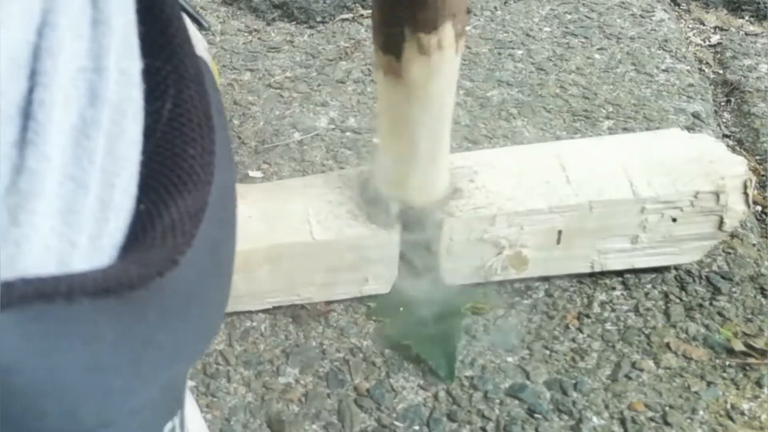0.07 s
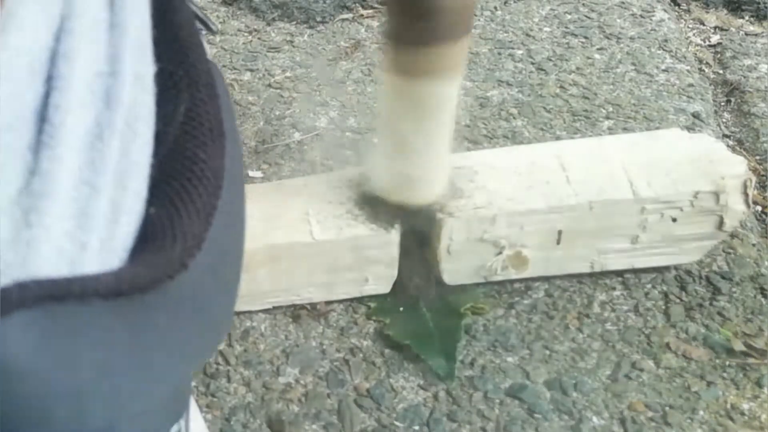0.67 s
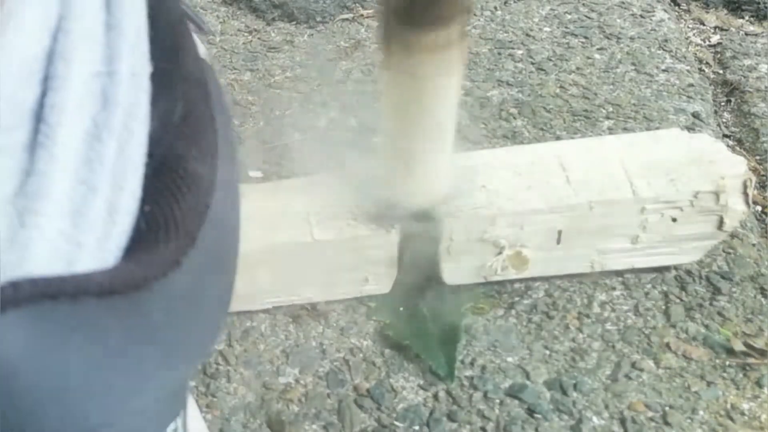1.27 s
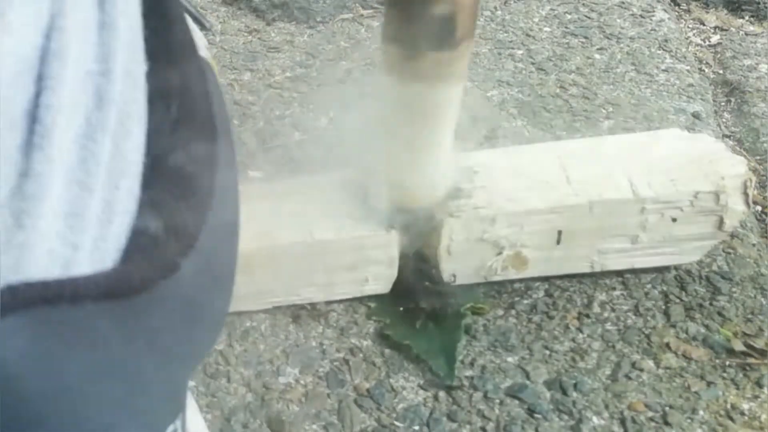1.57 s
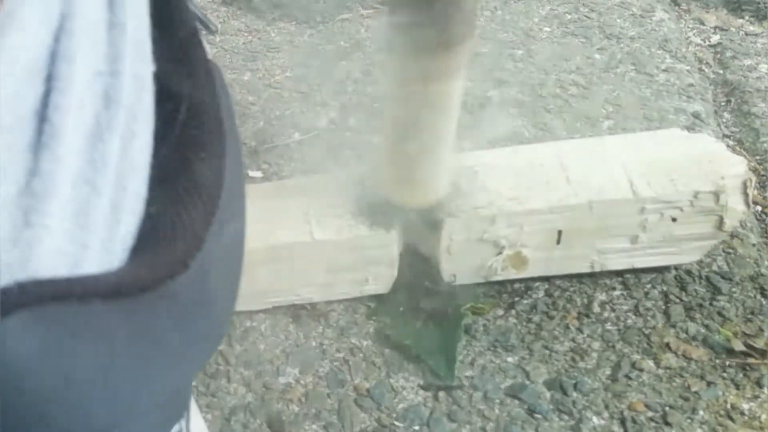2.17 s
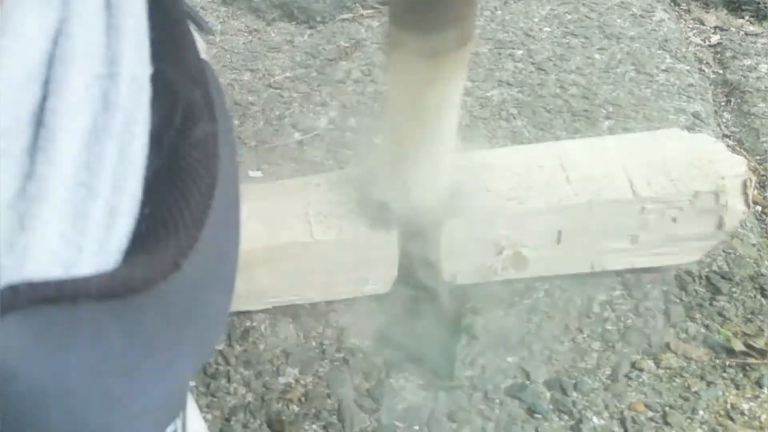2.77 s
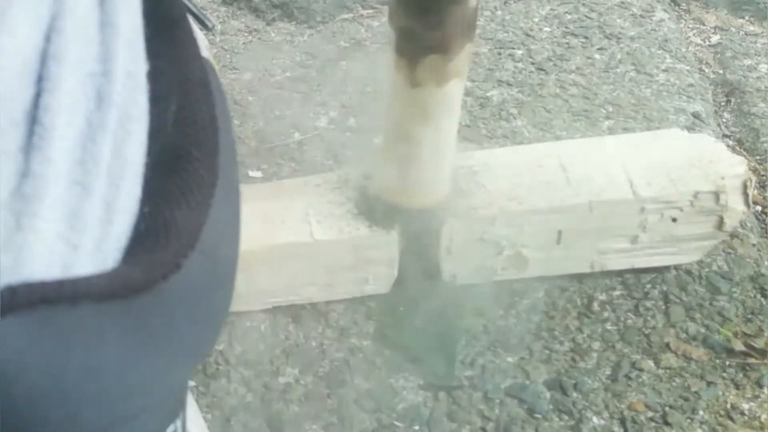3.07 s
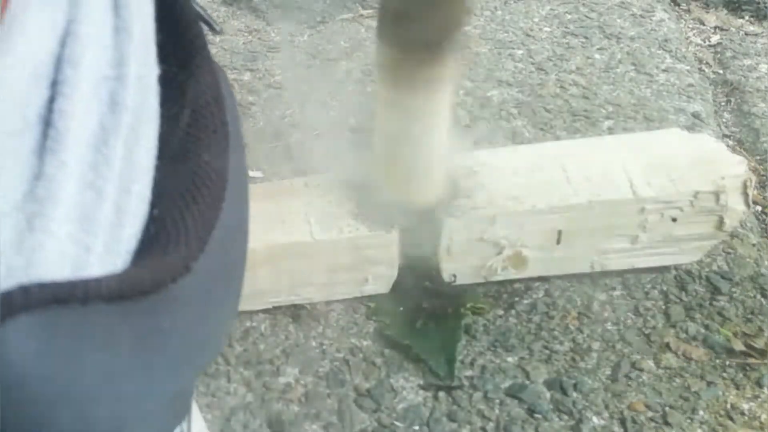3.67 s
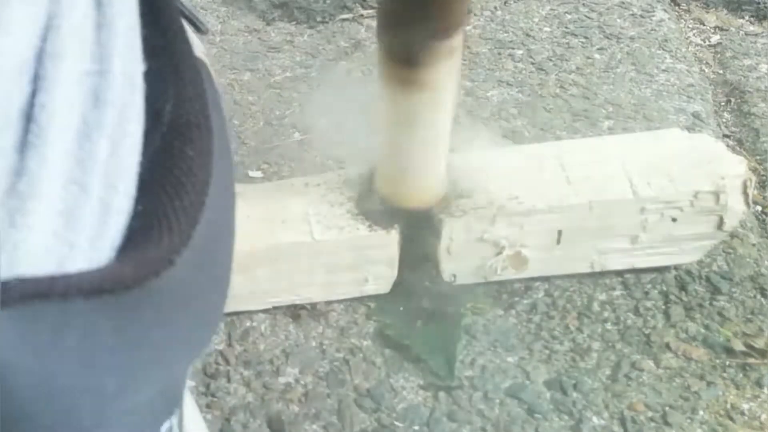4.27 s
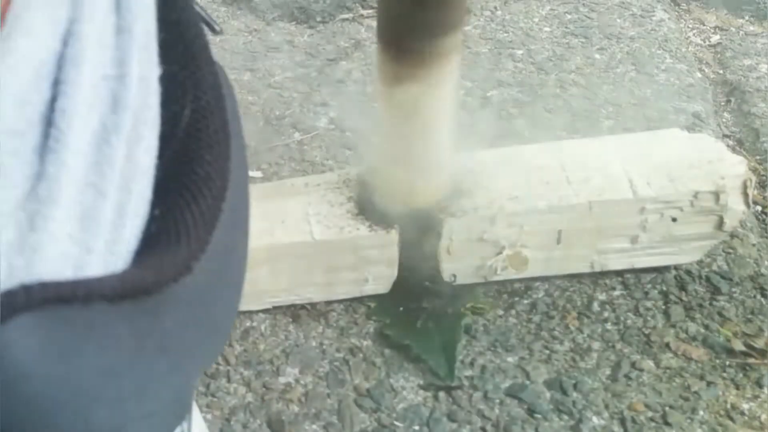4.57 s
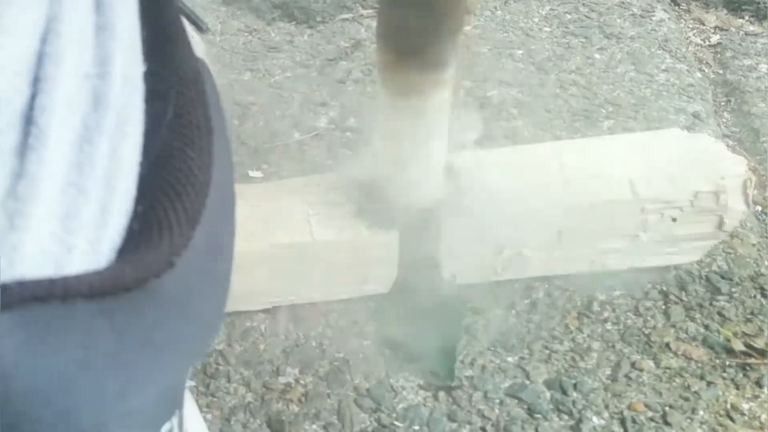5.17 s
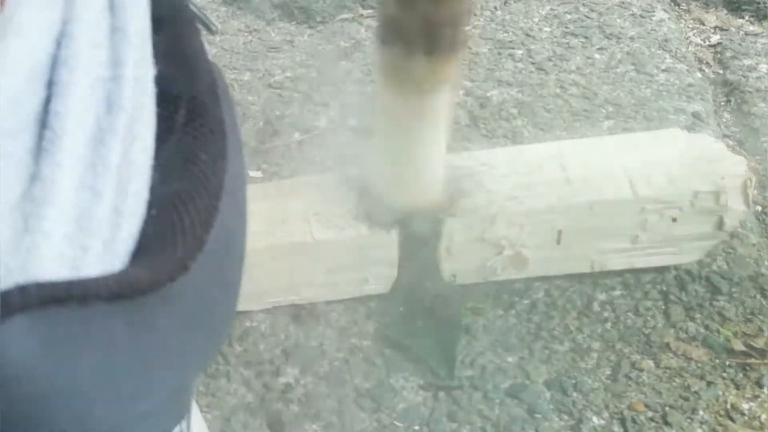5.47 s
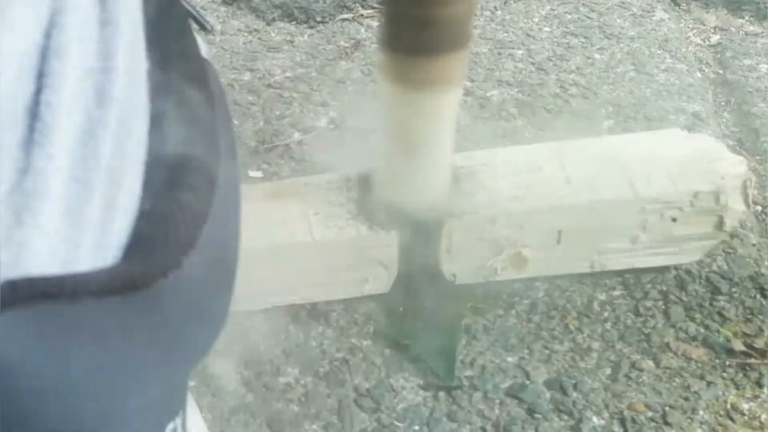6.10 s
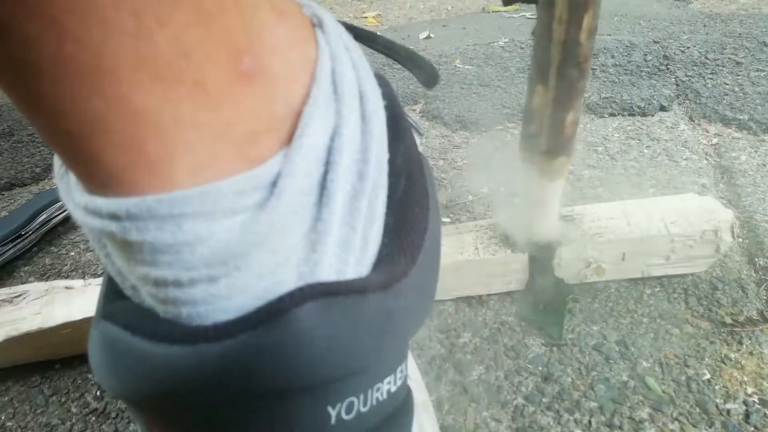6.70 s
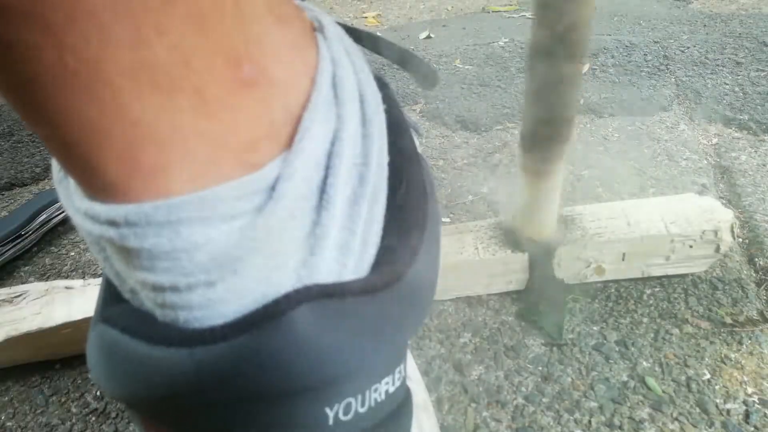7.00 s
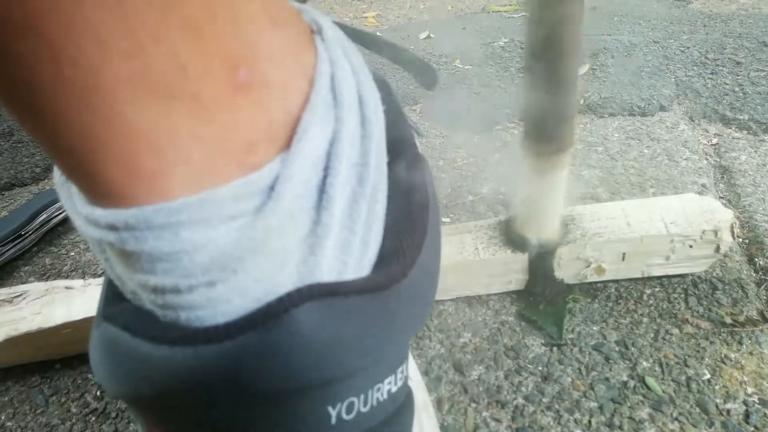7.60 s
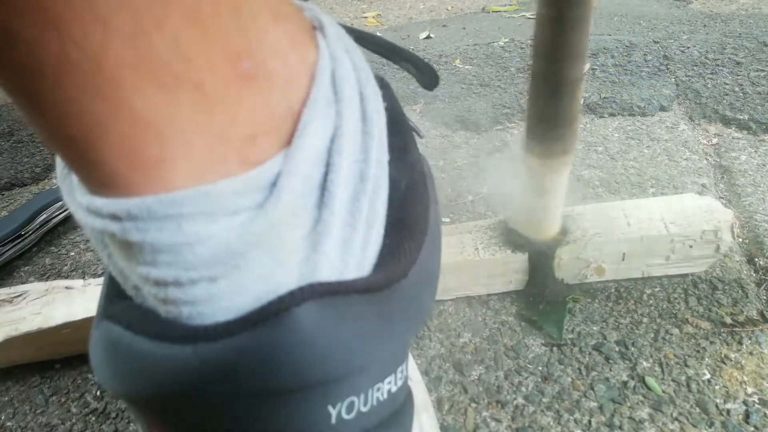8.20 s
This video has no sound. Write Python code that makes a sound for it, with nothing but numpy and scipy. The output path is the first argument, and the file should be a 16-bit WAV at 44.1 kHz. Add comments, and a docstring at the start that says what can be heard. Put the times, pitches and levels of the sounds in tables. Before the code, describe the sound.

Close by and mostly on the left, wood grinds against wood in a quick, even back-and-forth rhythm as a spindle is bowed in a board. Light thuds, occasional clicks and brief squeaks dot the dry, hissing rasp. In the last couple of seconds the bowing is more hurried, with frequent hollow knocks and rough scrapes. Faint outdoor air and a far engine-like hum lie underneath.

```python
"""Bow drill on a pavement

A wooden spindle spins to and fro in the socket of a fire board, about four strokes a second.
Each stroke rasps, rings and hisses; late in a push the spindle judders, and at times the tip squeaks
or bites. The bow knocks at some turns, more often as the work gets hurried. Low outdoor rumble and a
distant engine-like hum lie underneath. The camera is close, its right port facing away."""
import sys
import numpy as np
from scipy import signal
from scipy.fft import rfft, irfft, next_fast_len
from scipy.io import wavfile
from scipy.ndimage import uniform_filter1d, map_coordinates

SR = 44100
rng = np.random.default_rng(int(sys.argv[2]) if len(sys.argv) > 2 else 0)


def put_to_file(sound):
    """Save the sound as 16-bit audio at rate SR, in the file named by the first command-line argument."""
    columns = np.atleast_2d(sound).T  # one column per channel
    safe = np.clip(columns, -1, 1)
    whole_steps = np.round(safe * 32767)
    wavfile.write(sys.argv[1], SR, whole_steps.astype(np.int16))


N = 372644

# hurry of the bowing: (time [s], haste [0 calm, about 1 hurried])
HASTE = [(0, 0.24), (2.5, 0.058), (5.9, 0.27), (6.6, 0.82), (8.45, 1.2)]
# spindle and board resonances: (frequency [Hz], width [Hz], lift [dB])
WOOD_MODES = [(194.4, 36, 6), (343, 50, 5.5), (456.3, 43, 9), (657, 390, 4.5), (839, 228, 11),
              (1350, 120, 13.5), (2117, 520, 6.5), (2467, 210, 5), (3190, 1300, 3.5), (6330, 1940, 7),
              (9540, 690, 7.5)]
# contact force spectra: (frequency [Hz], level [dB])
RASP_SPECTRUM = [(100, -16), (300, -2), (560, -3), (1050, -7), (1700, -0.5), (2600, -3), (2900, -9.5),
                 (3700, -8), (4050, -26.5), (6000, -22), (16000, -76)]
HISS_SPECTRUM = [(1500, -30), (4000, -0.5), (5000, 2), (7000, 3), (8000, 2.5), (11000, -2), (13500, 4.5),
                 (16000, 2.5)]
TICK_SPECTRUM = [(1000, -45), (4000, -2), (7000, 0), (10000, -1), (13000, -3), (16000, 0)]


def amp(db):
    return 10 ** (np.asarray(db) / 20)


def unit_rms(x):
    return x / np.sqrt(np.mean(x ** 2) + 1e-20)


def unit_peak(x):
    return x / np.abs(x).max()


def add(track, at_s, sound):
    part = track[round(at_s * SR):][:len(sound)]
    part += sound[:len(part)]


def log_interp(points, hz):
    knots_hz, values = np.transpose(points)
    return np.interp(np.log(hz + 1), np.log(knots_hz + 1), values)


def wobble(knots_per_s):
    """Smooth random curve."""
    return map_coordinates(rng.standard_normal(N // 40), [np.arange(N) * knots_per_s / SR], mode="wrap")


def coloured(x, spectrum, modes=()):
    """Minimum-phase filter: a spectrum lifted at each resonance."""
    size = 2 * next_fast_len(len(x) // 2 + 4096)
    hz = np.fft.rfftfreq(size, 1 / SR)
    lift_db = sum(lift / (1 + (2 * (hz - centre) / width) ** 2) for centre, width, lift in modes)
    cepstrum = irfft(np.log(amp(log_interp(spectrum, hz) + lift_db)))
    cepstrum[1:size // 2] *= 2
    cepstrum[size // 2 + 1:] = 0
    return irfft(rfft(x, size) * np.exp(rfft(cepstrum)))[:len(x)]


def ringing(x, hz, width_hz):
    """Two equal resonators in series."""
    b, a = signal.iirpeak(hz, hz / width_hz, SR)
    return signal.lfilter(b, a, signal.lfilter(b, a, x))


def slips(per_s, scatter_db, smooth):
    """Tiny slips of random size over a share of smooth sliding noise."""
    sizes = rng.standard_normal(N) * amp(scatter_db * rng.standard_normal(N))
    impulses = sizes * (rng.random(N) < per_s / SR)
    return unit_rms(unit_rms(impulses) + smooth * rng.standard_normal(N))


def bowing():
    """Spindle speed (0-1) and rasp, ring, hiss and rumble envelopes; all stop when the bow turns."""
    # pull and push in turn: (time [s], level [dB])
    strokes = [(-0.122, -37), (0.138, -37.5), (0.382, -35), (0.633, -35.5), (0.864, -36.5), (1.145, -37.5),
               (1.391, -36.5), (1.648, -37.5), (1.892, -36), (2.145, -36), (2.38, -35.5), (2.643, -35),
               (2.875, -34.5), (3.133, -33.5), (3.357, -36), (3.618, -36), (3.836, -33.5), (4.071, -35),
               (4.28, -34), (4.515, -36), (4.731, -34.5), (4.963, -35), (5.18, -34), (5.407, -35.5),
               (5.616, -34), (5.838, -34), (6.035, -33.5), (6.252, -33.5), (6.548, -33), (6.757, -34.5),
               (6.939, -33), (7.166, -35.5), (7.355, -34), (7.567, -35), (7.755, -33), (7.962, -37),
               (8.156, -33.5), (8.36, -37)]
    # pairs: (pull, push)
    pause_s, briskness = (0.0031, 0.01596), (1.7, 1.6)
    swell_db, haste_swell_db = (-0.5, 1.5), (8.5, -2)
    ring_db = (-5, -3.45)
    hiss_db, haste_hiss_db, tilt_hiss_db = (-17, -14.5), (0, 3.5), (0.5, 12)
    rumble_db, haste_rumble_db, tilt_rumble_db = (-8, -4.5), (-7, 1), (7, 19.5)
    last_turn_s, jam_start_s, jam_end_s, jam_db = 8.57, 6.43, 6.459, -12
    t = np.arange(N) / SR
    speed, rasp, ring, hiss, rumble = np.zeros((5, N))
    ends_s = [at_s for at_s, _ in strokes[1:]] + [last_turn_s]
    for i, ((turn_s, db), end_s) in enumerate(zip(strokes, ends_s)):
        way = i % 2
        start_s = turn_s + pause_s[way]
        haste = np.interp(turn_s, *np.transpose(HASTE))
        now = (t > start_s) & (t < end_s)
        progress = (t[now] - start_s) / (end_s - start_s)
        spin = np.tanh(briskness[way] * np.sin(np.pi * progress))
        tilt = progress - 0.5  # spindle leans against the socket wall
        pressure = amp(db + (swell_db[way] + haste * haste_swell_db[way]) * tilt)
        hiss_gain = amp(hiss_db[way] + haste * haste_hiss_db[way] + tilt * tilt_hiss_db[way])
        rumble_gain = amp(rumble_db[way] + haste * haste_rumble_db[way] + tilt * tilt_rumble_db[way])
        speed[now] += spin
        rasp[now] += pressure * spin ** 2.16
        ring[now] += pressure * amp(ring_db[way]) * spin ** 2.5
        hiss[now] += pressure * hiss_gain * spin ** 3
        rumble[now] += pressure * rumble_gain * spin ** 2.2
    jammed = uniform_filter1d(1.0 * ((t > jam_start_s) & (t < jam_end_s)), size=100)
    return amp(jam_db * jammed) * np.array([speed, rasp, ring, hiss, rumble])


def friction():
    """The tip slips in its socket; being out of round, it presses harder once a revolution."""
    # resonances driven by rubbing: (frequency [Hz], width [Hz])
    singing_modes = [(1412, 120), (1478, 137), (2530, 230)]
    spin_hz, floor = 33, amp(-65.5)
    speed, rasp, ring, hiss, rumble = bowing()
    angle = 2 * np.pi * np.cumsum(speed * spin_hz * amp(0.515 * wobble(3))) / SR
    press_db = 1.64 * np.sin(angle) + 1.6 * wobble(45)
    grit = coloured(slips(per_s=9000, scatter_db=1.5, smooth=0.87), RASP_SPECTRUM, WOOD_MODES)
    rasping = (amp(-2) * rasp + floor) * unit_rms(amp(press_db + 1.9 * wobble(70)) * grit)
    lower, upper, highest = (ringing(slips(per_s=2700, scatter_db=1, smooth=0.48), hz, width_hz)
                             for hz, width_hz in singing_modes)
    # spindle sway shifts the main ring between two close pitches
    sway = amp(5 * wobble(11))
    main_ring = (sway * lower + upper / sway) / np.hypot(sway, 1 / sway)
    singing = (ring + floor) * unit_rms(amp(0.9 * press_db) * main_ring)
    # the circling contact point wakes the highest mode once a revolution
    singing += amp(-12) * rasp * unit_rms(amp(10.4 * np.cos(angle) + 2.2 * wobble(11)) * highest)
    charred_dust = coloured(slips(per_s=18000, scatter_db=2, smooth=0.88), HISS_SPECTRUM, WOOD_MODES)
    hissing = hiss * unit_rms(amp(1.19 * press_db + 1.74 * wobble(110)) * charred_dust)
    rumbling = rumble * rocking(press_db)
    return rasping + singing + hissing + rumbling + sizzle(rasp * amp(press_db))


def rocking(press_db):
    """Sparse slips of the rocking spindle rumble in the wood."""
    # contact force: (frequency [Hz], level [dB])
    spectrum = [(25, -4.5), (60, -26), (100, 1.5), (140, -7.5), (210, -3), (300, -9), (480, -14.5),
                (700, -15.5), (2000, -82)]
    force = slips(per_s=500, scatter_db=4.5, smooth=0.65)
    return unit_rms(amp(press_db) * coloured(force, spectrum, WOOD_MODES))


def sizzle(envelope):
    """The hot tip adds a treble band that grows with haste."""
    haste = np.interp(np.arange(N) / SR, *np.transpose(HASTE))
    band = unit_rms(ringing(rng.standard_normal(N), hz=6480, width_hz=2800))
    return amp(-21) * haste * envelope * band


def outdoor_air():
    """Low rumble and faint hiss, alike at both ports in the bass."""
    # background: (frequency [Hz], level [dB])
    spectrum = [(20, -30), (55, 2), (100, -2.5), (140, 0), (230, -0.5), (330, -10.5), (600, -20.5),
                (1200, -22.5), (2500, -32.5), (7000, -37), (15000, -42.5)]
    # left-right likeness: (frequency [Hz], correlation [0-1])
    likeness = [(100, 0.96), (300, 0.4), (800, 0.16), (2000, 0.65), (5000, 0.035)]
    hz = np.fft.rfftfreq(N, 1 / SR)
    spread_rad = np.arccos(np.clip(log_interp(likeness, hz), -1, 1)) / 2
    noise_bins = rfft(rng.standard_normal((2, N))) * amp(log_interp(spectrum, hz))
    mid, side = irfft(noise_bins * [np.cos(spread_rad), np.sin(spread_rad)], N)
    return amp(-48.5) * unit_rms(np.array([mid + side, mid - side]))


def low_rumble(steady_db=-50.5, puff_width_s=0.063, flutter_db=2.5):
    """Low fluttering rumble with a few soft puffs and a distant engine-like hum near 100 Hz."""
    # swells of the rumble: (peak time [s], level [dB])
    puffs = [(0.38, -43), (0.85, -40), (1.29, -40), (1.68, -38), (2.09, -43.5), (6.73, -44.5), (7.56, -45),
             (7.95, -38.5)]
    # (frequency [Hz], level [dB])
    spectrum = [(15, -8.5), (30, -1.5), (58, -0.5), (80, -3.5), (100, -1), (130, -23.5),
                (250, -32), (800, -80)]
    t = np.arange(N) / SR
    rumble_and_hum = unit_rms(coloured(rng.standard_normal(N), spectrum, modes=[(100.4, 7.2, 5)]))
    swells = sum(amp(db) * np.exp(-((t - at_s) / puff_width_s) ** 2) for at_s, db in puffs)
    return np.hypot(amp(steady_db), swells) * amp(flutter_db * wobble(9)) * rumble_and_hum


def ticks(t60_s=0.015):
    """Short bright clicks with a little ring."""
    # clicks: (time [s], level [dB], body offset [dB])
    clicks = [(0.1293, -23, -11.5), (0.1535, -25.5, -27), (6.4584, -52, -8), (7.4108, -43, 4),
              (7.8103, -43, -1), (8.364, -48, 4.5), (8.378, -31.5, -30)]
    # ring of a click: (frequency [Hz], level [dB])
    body_spectrum = [(800, -50), (1700, -17), (2050, 5), (2550, -4), (3100, -0.5), (3600, -12), (4200, -3),
                     (7000, -25)]
    out, t = np.zeros(N), np.arange(SR // 20) / SR
    for at_s, db, body_db in clicks:
        snap = rng.standard_normal(len(t)) * amp(-60 * t / t60_s)
        add(out, at_s, amp(db + 5) * unit_peak(coloured(snap, TICK_SPECTRUM)))
        add(out, at_s, amp(db + body_db + 12) * unit_peak(coloured(snap, body_spectrum)))
    return out


def swishes():
    """Thin, fading hiss at the first clicks and as the jammed spindle breaks free."""
    # hiss bursts: (time [s], level [dB], T60 [s])
    bursts = [(0.131, -49.5, 0.77), (6.457, -50, 0.27)]
    out, t = np.zeros(N), np.arange(SR // 2) / SR
    for at_s, db, t60_s in bursts:
        hiss = unit_rms(coloured(rng.standard_normal(len(t)), TICK_SPECTRUM))
        add(out, at_s, amp(db - 60 * t / t60_s) * hiss)
    return out


def judders(rebound_s=0.016, rebound_db=-10):
    """The spindle catches and jumps, landing twice with a thud, a scrape and a ring of the wood."""
    # jumps: (time [s], level [dB], scrape offset [dB])
    jumps = [(0.323, -33, -25), (0.795, -25, -7.5), (1.32, -26.5, -1.5), (1.826, -24, -15.5),
             (2.313, -28.5, -0.5), (2.806, -32, -23), (3.29, -27, 1), (3.776, -24, -14), (4.22, -23.5, -5),
             (4.6695, -24, -7.5), (5.1187, -28, 1.5), (5.544, -35, -5), (5.978, -23, -6), (6.402, -24, -2),
             (6.493, -29.5, -5), (6.884, -29.5, -14), (7.297, -29, -18), (7.709, -34, -7)]
    # landing force: (frequency [Hz], level [dB])
    thud_spectrum = [(40, -38.5), (110, 1.5), (200, -2), (320, 0), (480, -0.5), (600, -10.5), (1000, -25),
                     (2000, -36), (6000, -90)]
    out, t = np.zeros(N), np.arange(SR // 10) / SR
    for jump_s, jump_db, scrape_db in jumps:
        for bounce in range(2):
            at_s, db = jump_s + bounce * rebound_s, jump_db + bounce * rebound_db
            chatter = rng.standard_normal((2, len(t)))
            blow = 0.061 * chatter[0] * amp(-60 * t / 0.1) - (t == 0)
            scrape = chatter[1] * amp(-60 * t / 0.0072)
            for delay_s, gain_db, part in (
                    (0.00423, 5, coloured(blow, thud_spectrum, WOOD_MODES)),
                    (0.0044, scrape_db + 10, coloured(scrape, RASP_SPECTRUM, WOOD_MODES)),
                    (0.004, scrape_db - 7, coloured(scrape, HISS_SPECTRUM, WOOD_MODES)),
                    (0.00308, scrape_db - 7, ringing(scrape, hz=1440, width_hz=180))):
                add(out, at_s + delay_s, amp(db + gain_db) * unit_peak(part))
    return out


def bow_knocks():
    """Bending waves in a stick run faster at high pitch: each knock drops from crack to hollow tock."""
    # knocks: (time [s], level [dB], crack offset [dB])
    knocks = [(0.363, -32.5, -33), (2.115, -27, -36), (2.598, -16.5, -22), (4.495, -28, -28),
              (6.036, -36.5, -9), (6.58, -16, -16), (6.981, -19, -14), (7.142, -18, -26),
              (7.357, -25, -12.5), (7.548, -17, -26), (7.752, -22, -7.5), (7.768, -28, -9),
              (8.151, -35, -14), (8.181, -28.5, -33)]
    # bow resonances: (frequency [Hz], width [Hz], lift [dB])
    stick_modes = [(203, 120, 17), (667, 400, 5), (830, 300, 11.5), (1270, 120, 8.5)]
    # impact spectra: (frequency [Hz], level [dB])
    tock_spectrum = [(80, -10), (200, -6.5), (420, -3.5), (650, 0.5), (900, -2), (1250, -7.5), (1700, -4),
                     (2600, -33), (6000, -61)]
    crack_spectrum = [(500, -26), (1400, 4), (2300, 6.5), (3200, -11), (4200, -25), (7000, -24.5),
                      (16000, -45)]
    out, t = np.zeros(N), np.arange(SR // 10) / SR
    hz = np.fft.rfftfreq(len(t), 1 / SR)
    delay_s = 0.00545 * np.exp(-hz / 1200)
    dispersion = np.exp(-2j * np.pi * np.cumsum(delay_s) * hz[1])
    for at_s, db, crack_db in knocks:
        rattle = rng.standard_normal((2, len(t)))
        blow = (t == 0) + 0.037 * rattle[0] * amp(-60 * t / 0.058)
        tock = irfft(rfft(coloured(blow, tock_spectrum, stick_modes)) * dispersion)
        crack = coloured(rattle[1] * amp(-60 * t / 0.018), crack_spectrum)
        add(out, at_s - 0.001, amp(db + 2) * unit_peak(tock))
        add(out, at_s - 0.001, amp(db + crack_db + 13.5) * unit_peak(crack))
    return out


def squeaks():
    """The tip sticks; its slips lock to one resonance for a few dozen cycles."""
    # squeaks: (time [s], level [dB], pitch [Hz])
    events = [(0.4283, -35, 2530), (3.488, -34, 2580), (3.5619, -32, 2484), (4.352, -32, 2460),
              (4.4204, -44, 2440), (4.4511, -35, 2544)]
    out, t = np.zeros(N), np.arange(SR // 40) / SR
    swell = np.sin(np.pi * t / t[-1]) ** 3
    for at_s, db, hz in events:
        phase = 2 * np.pi * hz * t + np.cumsum(0.082 * rng.standard_normal(len(t)))
        add(out, at_s - 0.005, amp(db + 1.5) * swell * np.sin(phase))
    return out


def cord_creak(start_s=5.13, length_s=0.097, slip_hz=395, db=-49):
    """The taut cord slips on the spindle in a quick, uneven train that slows a little."""
    # cord slip: (frequency [Hz], level [dB])
    spectrum = [(500, -23), (1400, 1), (2700, -1), (3600, -4), (4500, -9), (6000, -15), (15000, -18)]
    progress = np.clip((np.arange(N) / SR - start_s) / length_s, 0, 1)
    rate_hz = slip_hz * (1 + 0.04 * wobble(300) - 0.053 * progress)
    pulses = np.diff(np.floor(np.cumsum(rate_hz) / SR), prepend=0)
    swell = np.sqrt(np.abs(np.sin(np.pi * progress)))
    return amp(db) * swell * unit_rms(coloured(pulses, spectrum))


def bites(attack_s=0.00047, t60_s=0.027):
    """The tip bites into dry wood, briefly roughening the rasp."""
    # bites: (time [s], level [dB])
    events = [(6.117, -34), (6.459, -39), (6.472, -33), (6.675, -30), (6.6994, -33), (7.411, -32),
              (7.4819, -29), (7.811, -28), (8.2242, -30.5)]
    out, t = np.zeros(N), np.arange(SR // 10) / SR
    for at_s, db in events:
        scrape = rng.standard_normal(len(t)) * amp(-60 * t / t60_s) * (1 - np.exp(-t / attack_s))
        add(out, at_s, amp(db + 3.5) * unit_peak(coloured(scrape, RASP_SPECTRUM, WOOD_MODES)))
        add(out, at_s, amp(db + 3) * unit_peak(ringing(scrape, hz=1490, width_hz=740)))
    return out


def far_port(x, lag_samples=25, scatter_db=-24.5, scatter_t60_s=0.038):
    """Sound arrives late and shaded by the camera body, with scatter from pavement and leg."""
    # right port re left: (frequency [Hz], gain [dB])
    shade = [(150, -0.5), (300, -1), (480, -3), (800, -7), (1100, -9.5), (1450, -15), (2000, -15),
             (2600, -18.5), (6000, -22.5), (15000, -28)]
    t = np.arange(SR // 20) / SR
    tail = rng.standard_normal(len(t)) * amp(-60 * t / scatter_t60_s)
    scatter = amp(scatter_db) * signal.fftconvolve(x, tail / np.linalg.norm(tail))[:N]
    return np.pad(coloured(x, shade) + scatter, (lag_samples, 0))[:N]


def scene():
    """Drill direct on the left, shaded on the right, in outdoor air."""
    drill = friction() + judders() + bites() + squeaks() + cord_creak()
    drill += bow_knocks() + ticks() + swishes()
    return np.array([drill, far_port(drill)]) + outdoor_air() + low_rumble()


def record(dry):
    """Steep low-pass at the camera's band limit."""
    cutoff_hz = 15950
    hz = np.fft.rfftfreq(N, 1 / SR)
    return irfft(rfft(dry) / (1 + (hz / cutoff_hz) ** 160), N)


dry = scene()
out = record(dry)
put_to_file(out)
```